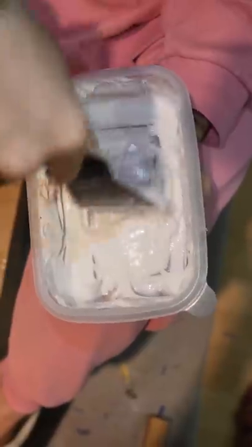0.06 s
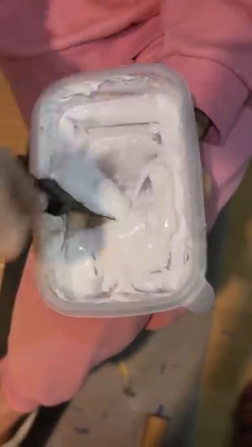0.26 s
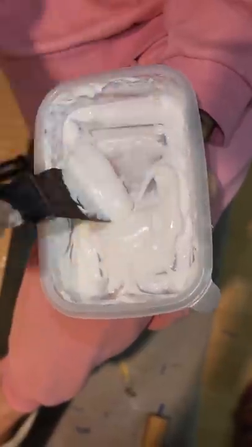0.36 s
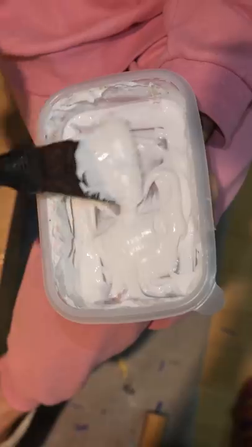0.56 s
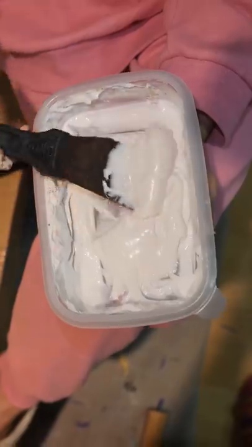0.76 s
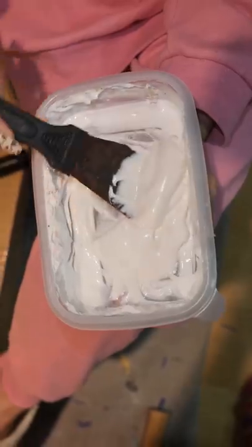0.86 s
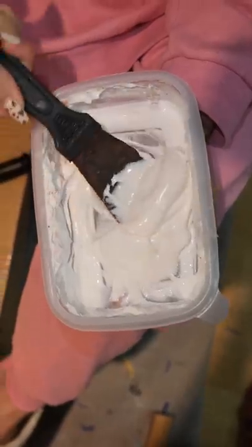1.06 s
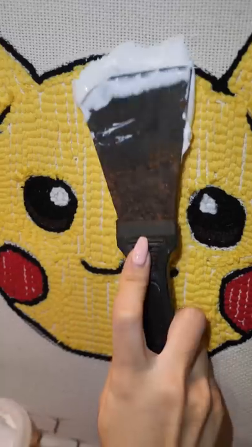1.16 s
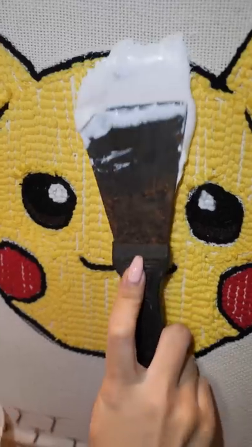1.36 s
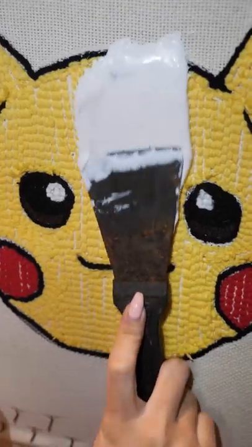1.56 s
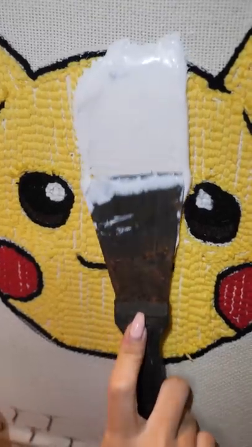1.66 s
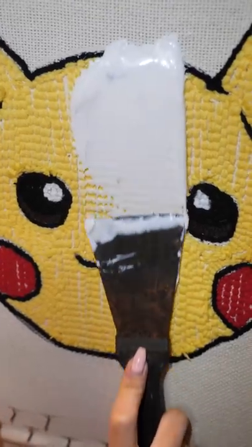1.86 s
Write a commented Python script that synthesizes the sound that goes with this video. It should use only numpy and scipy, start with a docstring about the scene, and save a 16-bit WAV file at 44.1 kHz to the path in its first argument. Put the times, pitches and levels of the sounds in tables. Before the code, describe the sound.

Close to the microphone in a quiet room, a blade knocks a plastic tub and scrapes up thick paste, squishing and popping. After a soft tap, it slides steadily over a rug's back, faintly rumbling and hissing.

```python
"""In a quiet room, a steel scraper knocks into a plastic tub of thick paste, and the tub shudders.
The blade scrapes up a load, rasping along the plastic while the paste smacks and pops.
After one more soft knock, it is drawn steadily over the back of a stretched rug:
a soft rumble of tufts under the hiss of smeared paste. The microphone is close and nearly mono."""
import sys
import numpy as np
from scipy import signal
from scipy.fft import rfft, irfft
from scipy.io import wavfile

SR = 44100
rng = np.random.default_rng(int(sys.argv[2]) if len(sys.argv) > 2 else 0)


def unload_wav(signal):
    """Save mono or channel-first audio to the path in sys.argv[1] as 16-bit WAV at rate SR, clipped to [-1, 1]."""
    wavfile.write(
        sys.argv[1],
        SR,
        np.round(np.clip(np.atleast_2d(signal).T, -1, 1) * 32767).astype(np.int16),
    )


N = 83790
TIME = np.arange(N) / SR


# How loud the scrape is. Each row: time in seconds, rasp level in dB, grit level in dB.
SCRAPE_LEVELS = [(0.34, -67, -68), (0.349, -40, -50.5), (0.465, -37.5, -48), (0.5, -30, -32),
                 (0.56, -24, -28), (0.592, -24.5, -26.5), (0.62, -24, -21), (0.66, -25.5, -23),
                 (0.705, -28, -30.5), (0.8, -29, -39.5), (0.89, -33.5, -40), (0.97, -55.5, -59.5),
                 (1.05, -50.5, -53.5), (1.11, -66, -76)]
# How hard the blade shakes the tub's wall. Each row: time in seconds, level in dB.
WALL_LEVELS = [(0.46, -46.5), (0.59, -47), (0.657, -25.5), (0.7, -32), (0.78, -35), (0.81, -42),
               (0.93, -46)]
# The tone of the rasp, the bright grit and the wall. Each row: frequency in Hz, strength in dB.
RASP_TONE = [(400, -59), (800, -2.5), (1300, 6.5), (1800, 10), (2500, -17), (3400, -1.5), (4200, -6),
             (6000, -42)]
GRIT_TONE = [(1500, 5), (3200, 3.5), (4200, 6), (6000, 3.5), (11500, -4), (15500, -4)]
WALL_TONE = [(200, -38), (450, -0.5), (680, 3.5), (900, -3), (1080, 12.5), (1300, -7), (1900, -44)]

def scrape():
    """The edge sticks and slips along the tub: ringing rasp, grit, and the wall's hollow answer."""
    rasp_gain, grit_gain = gains(SCRAPE_LEVELS)
    wall_gain, = gains(WALL_LEVELS)
    edge = slips(per_second=2500, uneven_db=1.5, clump_db=2.5, clump_hz=76)
    fine = slips(per_second=3100, uneven_db=1, clump_db=1, clump_hz=43)
    ringing = from_db(-1.5) * blade(edge)
    rasp = from_db(-4.5) * squelch(colour(edge, RASP_TONE), depth_db=8.5, rate_hz=34)
    grit = from_db(0.5) * squelch(colour(fine, GRIT_TONE), depth_db=5, rate_hz=30)
    wall = colour(edge, WALL_TONE)
    return rasp_gain * (ringing + rasp) + grit_gain * grit + wall_gain * wall


# The notes of blade and tub. Each row: pitch in Hz, width in Hz (narrow rings longer), level in dB.
BLADE_NOTES = [(1190, 65, -3), (1620, 350, 0.5), (1858, 67, 13), (1896, 147, 14.5), (2440, 600, 12),
               (3710, 77, -1), (4230, 30, -7)]

def blade(edge):
    """Each slip of the edge sets the blade and tub ringing at their own notes."""
    out = 0
    for k, (hz, width, db) in enumerate(BLADE_NOTES):
        note = ring(edge, hz, fade_s=np.log(1000) / np.pi / width)
        out = out + (-1) ** k * from_db(db) * rms_one(note)
    return rms_one(out)


def squelch(x, depth_db, rate_hz, bands=18):
    """Gaps in the paste open and close, so each narrow band of pitches swells and fades on its own."""
    centres_hz = np.geomspace(500, 16000, bands)
    spectrum, hz = rfft(x), np.fft.rfftfreq(N, 1 / SR)
    out = 0
    for one_band in np.eye(bands):
        band = irfft(spectrum * np.interp(hz, centres_hz, one_band), N)
        out = out + band * from_db(depth_db * np.tanh(drift(rate_hz)))
    return rms_one(out)


# Moments when the edge catches. Each row: start in seconds, level in dB, length in seconds.
CATCHES = [(0.244, -40, 0.022), (0.272, -38.5, 0.013), (0.611, -26, 0.0029), (0.684, -17, 0.0043),
           (0.777, -21.5, 0.0027), (0.876, -33.5, 0.013), (1.348, -49, 0.012)]
# The tone of a catch. Each row: frequency in Hz, strength in dB.
CATCH_TONE = [(400, -3), (1900, 3), (3400, 1), (4100, 2.5), (4900, -2.5), (15000, -17.5)]

def catches(release_s=0.0018):
    """The edge digs in with a short, harsh burst of slips that sets the blade ringing."""
    gain = 0
    for start, db, length in CATCHES:
        fade = np.exp(-np.clip((TIME - start - length) / release_s, 0, 30))
        gain = gain + from_db(db) * (TIME >= start) * fade
    edge = slips(per_second=8400, uneven_db=0, clump_db=3, clump_hz=60)
    return gain * (colour(edge, CATCH_TONE) + from_db(-4) * blade(edge))


# Knocks on the tub. Each row: time in seconds, level in dB, pitch in Hz, fade time in seconds.
KNOCKS = [(0.222, -27, 370, 0.0036), (0.2423, 1.5, 314, 0.0012), (0.793, -20.5, 340, 0.0027),
          (1.064, -22.5, 520, 0.0028)]
# The tub shudders as the blade settles. Each row: start in seconds, level in dB.
SHUDDERS = [(0.249, -23.5), (0.264, -18.5), (0.303, -26)]

def knocks(rise_s=0.001):
    """Thuds, cushioned by paste, swell and die almost at once; the tub shudders with a low note."""
    thuds = 0
    for when, db, hz, decay in KNOCKS:
        t = np.clip(TIME - when, -.1, .1)
        swell = np.exp(-np.logaddexp(-t / rise_s, t / decay))
        phase = 2 * np.pi * hz * t
        overtone = from_db(-10) * np.sin(2.28 * phase)
        thuds = thuds - from_db(db) * swell * (np.cos(phase) + overtone)
    taps = sum(click(start, db) for start, db in SHUDDERS)
    return thuds + ring(taps, hz=357, fade_s=0.082)


# Wet smacks. Each row: start in seconds, level in dB, middle pitch in Hz.
SMACKS = [(0.218, -46, 1700), (0.349, -35, 2620), (0.613, -19.5, 1865), (0.62, -18, 1810),
          (0.637, -18.5, 1674), (0.643, -14, 1736), (0.652, -17.5, 1098), (0.661, -25, 1270),
          (0.777, -20, 1357), (0.87, -27, 2300), (0.946, -38, 1390), (1.016, -37, 1720)]

def smacks(count=12, smack_cycles=6.9, fade_cycles=3.4, scatter_octaves=0.328, rise=0.049):
    """Paste tears from the blade in a cluster of rising bubbles; bigger, lower pockets take longer."""
    t = TIME[:SR // 20, None]
    out = 0
    for start, db, hz in SMACKS:
        length = smack_cycles / hz
        onsets = length * (np.arange(count) + rng.random(count)) / count
        pitches = hz * 2 ** (scatter_octaves * rng.standard_normal(count))
        cycles = np.maximum(t - onsets, 0) * pitches
        age = cycles / fade_cycles
        bubbles = np.exp(-age) * np.sin(2 * np.pi * cycles * (1 + rise * age))
        cluster = bubbles @ rng.standard_normal(count)  # mix them at random strengths
        out = out + burst_at(filtered(cluster, hz / 2, "high"), start, db, length)
    return out


# Small pops. Each row: start in seconds, level in dB, pitch in Hz, fade time in seconds.
POPS = [(0.251, -35, 8900, 0.0005), (0.2774, -29.5, 12100, 0.00078), (0.507, -27.5, 5900, 0.0015),
        (0.6, -22, 6940, 0.0058), (0.623, -23, 6300, 0.003), (0.6868, -19, 6950, 0.0013),
        (1.063, -39, 6100, 0.00088), (1.128, -44.5, 2980, 0.0019), (1.148, -34, 10300, 0.0007),
        (1.681, -31, 9200, 0.0006)]

def pops(band_ratio=1.4):
    """Air pockets in the paste burst with a brief, bright tick."""
    t = TIME[:SR // 20]
    out = 0
    for start, db, hz, decay in POPS:
        burst = rng.standard_normal(len(t)) * np.exp(-t / decay)
        tick = filtered(burst, [hz / band_ratio, hz * band_ratio], "band")
        out = out + burst_at(tick, start, db, decay)
    return out


# The stroke over the rug. Each row: time in seconds, rumble level in dB, hiss level in dB.
STROKE_LEVELS = [(1.125, -51, -53.5), (1.17, -31, -54.5), (1.25, -35, -57), (1.33, -33.5, -49.5),
                 (1.58, -34, -48.5), (1.9, -33.5, -51.5)]
# The low tone of the tufts. Each row: frequency in Hz, strength in dB.
TUFT_TONE = [(150, 7.5), (192, 15.5), (240, 1.5), (430, -8), (640, -11), (775, -1.5), (950, -9.5),
             (1400, -13), (2000, -22.5), (3200, -41)]

def rug_stroke():
    """The blade bumps over the tufts of the tight rug while the paste smears with a fine hiss."""
    rumble_gain, hiss_gain = gains(STROKE_LEVELS)
    bumps = slips(per_second=1100, uneven_db=-0.4, clump_db=-0.5, clump_hz=26)
    rumble = from_db(0.5) * colour(bumps, TUFT_TONE)
    hiss = from_db(1) * fine_hiss()
    return rumble_gain * rumble + hiss_gain * hiss


# The bright tone of the hiss. Each row: frequency in Hz, strength in dB.
HISS_TONE = [(2000, -2.5), (3500, -7), (7500, 1.5), (15500, 0.5)]

def fine_hiss():
    """Thousands of tiny ticks blur into a hiss that differs between the ears."""
    ticks = slips(per_second=23000, uneven_db=3.5, clump_db=0, clump_hz=120)
    side = colour(rng.standard_normal(N), HISS_TONE)
    return stereo(colour(ticks, HISS_TONE), side, side_db=-2.5)


def echo(x, fade_s=0.4, delay_s=0.004):
    """Sound bounces around a small furnished room and quickly dies away."""
    t = TIME[:SR // 2]
    tail = rng.standard_normal(len(t)) * from_db(-60 * t / fade_s) * (t > delay_s)
    return signal.fftconvolve(x, tail / np.linalg.norm(tail))[:N]


# The dull tone of the room. Each row: frequency in Hz, strength in dB.
ROOM_TONE = [(200, -6.5), (560, -7), (1000, -9), (2100, -30.5), (15500, -32.5)]
# How loud the room noise and the opening hiss are. Each row: time in seconds, level in dB.
ROOM_LEVELS = [(0, -42.5), (0.15, -50), (0.4, -43), (1.9, -42.5)]
EARLY_HISS_LEVELS = [(0, -52.5), (0.15, -59.5), (0.33, -53.5)]

def room():
    """Low room noise dips briefly, then holds steady; a faint hiss is heard only at the start."""
    middle, side = (colour(noise, ROOM_TONE) for noise in rng.standard_normal((2, N)))
    room_gain, = gains(ROOM_LEVELS)
    hiss_gain, = gains(EARLY_HISS_LEVELS)
    return room_gain * stereo(middle, side, side_db=-25) + hiss_gain * fine_hiss()


def slips(per_second, uneven_db, clump_db, clump_hz):
    """Tiny random clicks of uneven size, growing louder and softer in clumps."""
    happens = rng.random(N) < per_second / SR
    size_db = uneven_db * np.minimum(rng.exponential(1, N), 4)
    swell_db = clump_db * np.tanh(drift(clump_hz))
    return happens * from_db(size_db + swell_db) * rng.choice([-1, 1], N)


def drift(rate_hz):
    """A smooth random wobble, about 1 in size."""
    r = np.exp(-2 * np.pi * rate_hz / SR)
    return rms_one(signal.lfilter([1], [1, -2 * r, r * r], rng.standard_normal(N + SR))[SR:])


def click(start, db):
    """A single click, one sample long."""
    out = np.zeros(N)
    out[int(start * SR)] = from_db(db)
    return out


def ring(x, hz, fade_s):
    """Each click in x starts a pure note that falls by 60 dB in fade_s seconds."""
    r, w = from_db(-60 / (fade_s * SR)), 2 * np.pi * hz / SR
    return signal.lfilter([0, np.sin(w)], [1, -2 * r * np.cos(w), r * r], x + 1e-18)


def colour(x, tone):
    """Shape a sound with a tone table, falling away past its ends; the result has average level 1."""
    hz, db = np.transpose(tone)
    octave, points = np.log2(np.maximum(np.fft.rfftfreq(N, 1 / SR), 1)), np.log2(hz)
    beyond = np.abs(octave - np.clip(octave, points[0], points[-1]))
    gain = from_db(np.interp(octave, points, db) - 20 * beyond)
    return rms_one(irfft(rfft(x) * gain, N))


def filtered(x, hz, keep):
    """Gently keep the "high" part of a sound, or one "band" of it."""
    return signal.sosfilt(signal.butter(2, hz, keep, fs=SR, output="sos"), x + 1e-18)


def gains(rows):
    """A volume curve for each dB column, fading fast outside the table's times."""
    times, *columns = np.transpose(rows)
    outside = np.maximum(times[0] - TIME, 0) + np.maximum(TIME - times[-1], 0)
    fade = np.exp(-np.minimum(outside / .01, 30))
    return [from_db(np.interp(TIME, times, db)) * fade for db in columns]


def burst_at(x, start, db, length):
    """Place a short sound in time, with the energy of that level held for that length."""
    x = from_db(db) * x * np.sqrt(length * SR / np.sum(x ** 2))
    return np.pad(x, (int(start * SR), N))[:N]


def stereo(middle, side, side_db):
    """Add the side sound to the left ear and subtract it from the right."""
    return middle + from_db(side_db) * side * [[1], [-1]]


def from_db(db):
    """Turn decibels into a number to multiply by."""
    return 10 ** (np.asarray(db) / 20)


def rms_one(x):
    """Scale a sound so its average level (rms) is 1."""
    return x / np.sqrt(np.mean(x ** 2) + 1e-20)


def scene():
    """The sounds in the tub with their echo, then the stroke over the rug, all in a quiet room."""
    tub = scrape() + catches() + knocks() + pops() + smacks()
    return tub + from_db(-17) * echo(tub) + rug_stroke() + room()


def record(dry, bass_cut_hz=213.9, bass_leak_db=-32, treble_cut_hz=15900):
    """A small microphone lets only a little deep bass through and loses the very highest treble."""
    hz = np.fft.rfftfreq(2 * N, 1 / SR)
    slope = (hz / bass_cut_hz) ** 10
    bass_cut = slope / np.sqrt(1 + slope ** 2) + from_db(bass_leak_db)
    thin = irfft(rfft(dry, 2 * N) * bass_cut)[:, :N]
    return signal.sosfilt(signal.ellip(12, .1, 80, treble_cut_hz, fs=SR, output="sos"), thin)


dry = scene()
out = record(dry)
unload_wav(out)
```